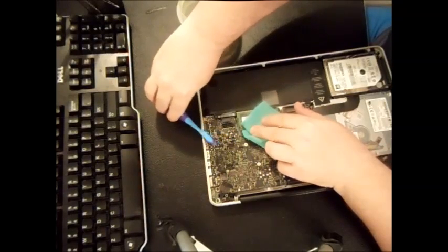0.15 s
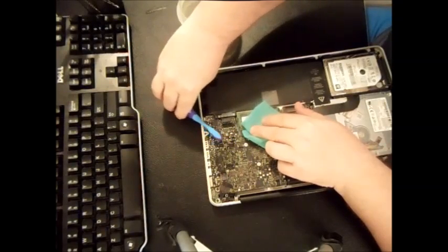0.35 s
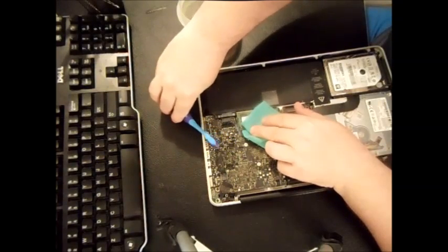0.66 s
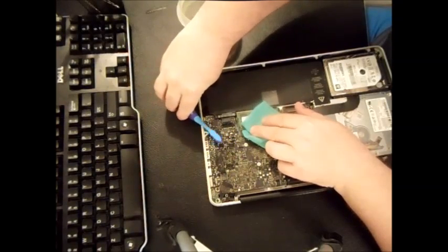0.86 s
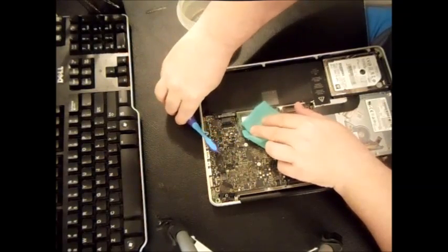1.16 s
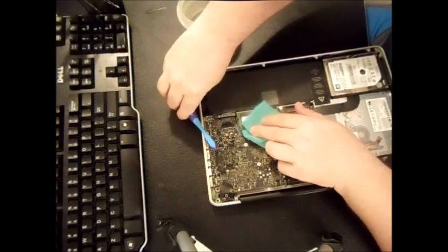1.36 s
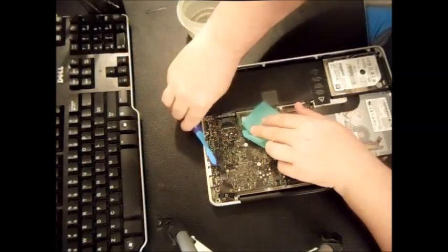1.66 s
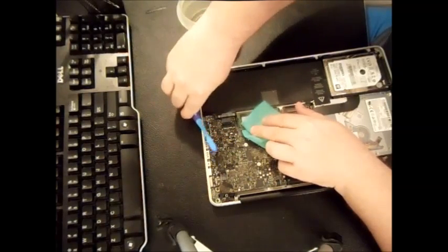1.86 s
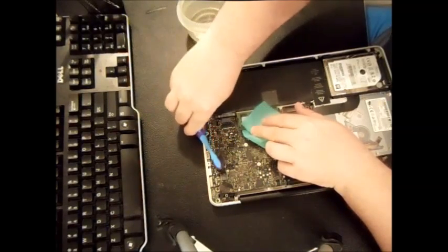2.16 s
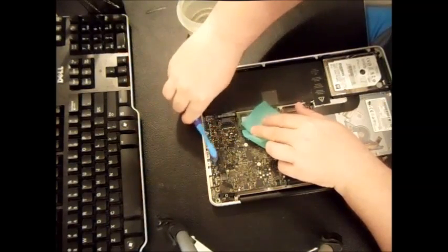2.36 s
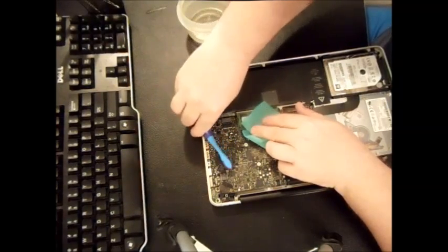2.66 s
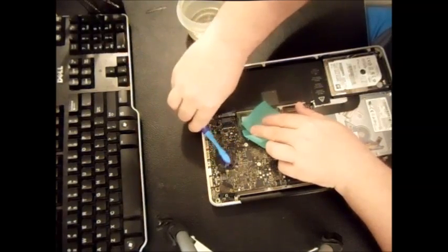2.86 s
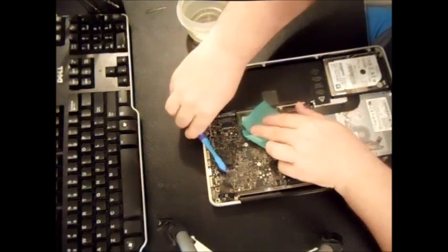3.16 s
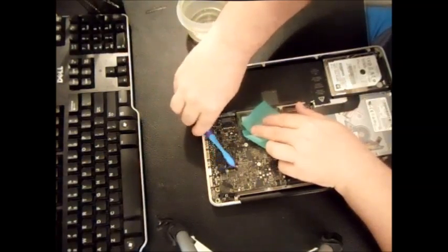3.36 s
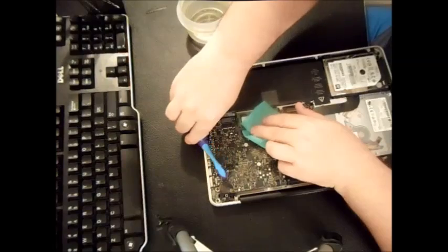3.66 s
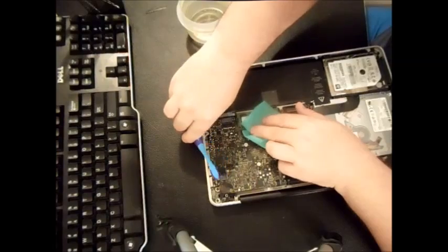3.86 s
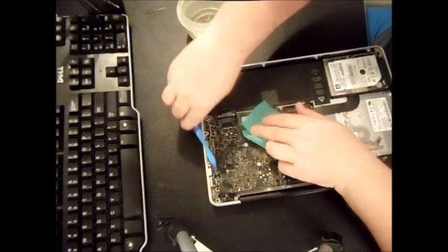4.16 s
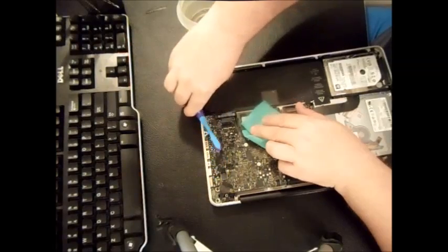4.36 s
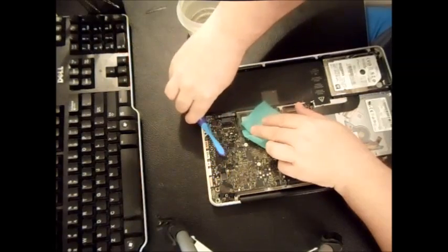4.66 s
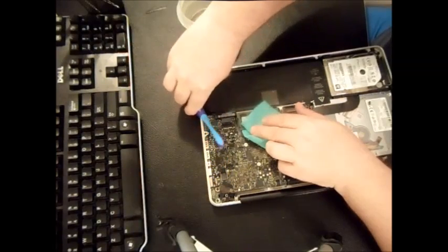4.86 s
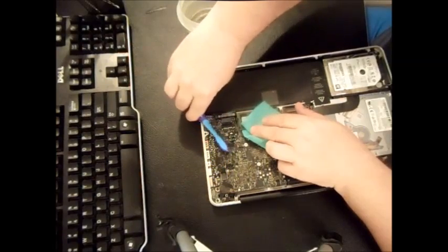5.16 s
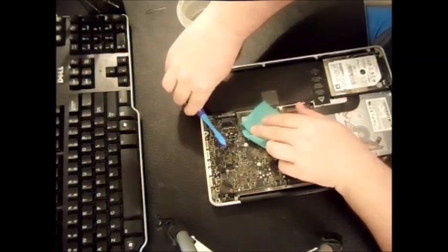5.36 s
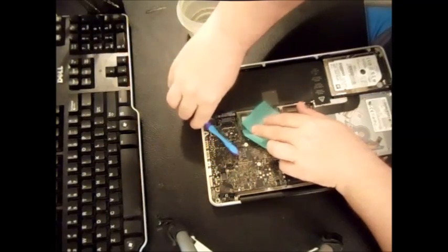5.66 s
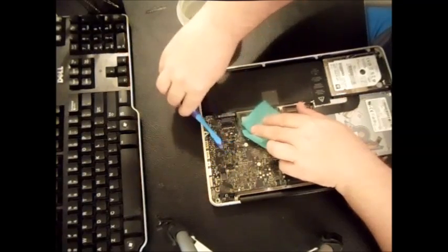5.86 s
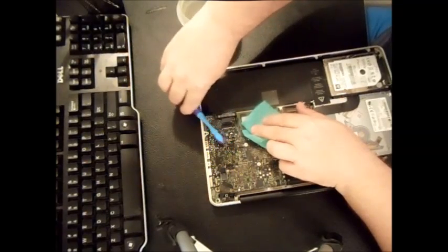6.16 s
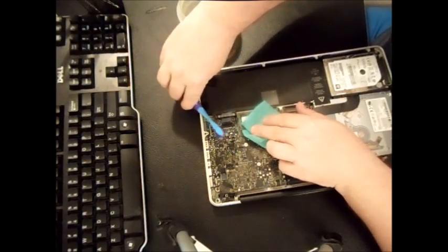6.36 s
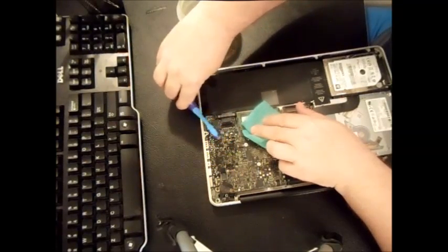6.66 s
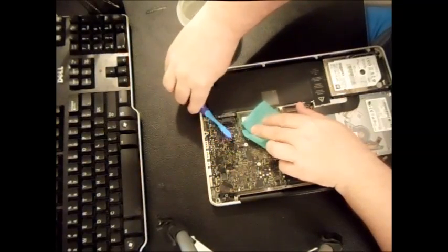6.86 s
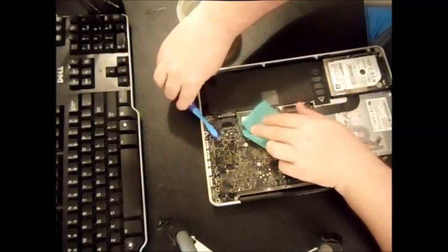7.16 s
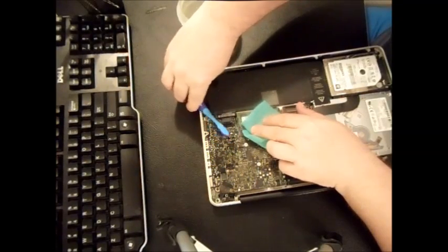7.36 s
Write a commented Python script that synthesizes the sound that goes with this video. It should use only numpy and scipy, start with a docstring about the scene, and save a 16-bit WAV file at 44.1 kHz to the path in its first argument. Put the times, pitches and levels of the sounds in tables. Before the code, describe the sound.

A small brush scrubs a circuit board in short, scratchy strokes with occasional sharp ticks, over a steady low computer hum and rumble.

```python
"""A toothbrush lightly scrubs the circuit board of an opened laptop on a workbench.
From the start a computer hums below: disk and fan tones, rushing fan air and a low rumble of the bench.
Short strokes hiss and crackle throughout, made of tiny random slips that also set the board ringing.
From about 0.4 s on, tufts now and then snap off a component: a bright snap, a knock and a rattle.
The brush moves from the far end to the near end at 2.3 s, to the middle at 4 s and back at 6 s."""
import sys
import numpy as np
from scipy import signal
from scipy.fft import rfft, irfft
from scipy.io import wavfile

SR = 44100
rng = np.random.default_rng(int(sys.argv[2]) if len(sys.argv) > 2 else 0)


def generate_wav(sig):
    """Save sig (samples, or channels by samples) to the path in sys.argv[1] as 16-bit PCM at SR."""
    pcm = np.round(np.clip(np.atleast_2d(sig).T, -1, 1) * 32767).astype(np.int16)
    wavfile.write(sys.argv[1], SR, pcm)


N = 331191
TIME = np.arange(N) / SR  # seconds
FREQS = np.fft.rfftfreq(N, 1 / SR)  # Hz


# colour of the bristle hiss: [pitch_hz, relative_level_db]
BRISTLE_COLOUR = [(500, -35), (1200, 1.5), (2200, -0.5), (3300, 0.5), (4500, 1.5), (5600, 1.5), (7500, 0.5),
                  (8400, -2), (9200, 0), (11500, -2), (13300, -5), (14200, -8)]
# where the brush is on the board: [time_s, place (0 far end, 1 middle, 2 near end)]
BRUSH_PLACE = [(2.3, 0), (2.44, 2), (4.0, 2), (4.4, 1), (6.0, 1), (6.1, 0)]
# resonances of board and brush at three places: [pitch_hz, width_hz, relative_level_db]
FAR_END_MODES = [(2060, 310, 1.5), (4440, 550, -1.5), (5220, 250, -2), (6320, 160, -1), (6940, 240, -3),
                 (7740, 280, 1), (9050, 450, -5.5), (10000, 350, -5.5), (11100, 320, -6), (12400, 380, -5)]
MIDDLE_BOARD_MODES = [(2200, 1300, -8.5), (3900, 220, -4.5), (4950, 300, 0), (5200, 200, -1.5),
                      (5980, 400, -8), (6440, 260, -5), (6900, 330, -6), (9450, 380, -17),
                      (11300, 200, -16)]
NEAR_END_MODES = [(2600, 1700, -0.5), (4060, 240, 7), (4960, 680, 4), (5470, 280, 2), (5700, 300, -4),
                  (6300, 250, -6), (6570, 180, 0.5), (7650, 300, -4), (13000, 360, -10)]


def scrubbing(sparkle_hz=9000, sparkle_db=-3, sparkle_power=1.7, fast_stroke_db=-49, bumps_db=0.94):
    """The bristle tips hiss with each stroke; bearing down rings the part of the board under the brush."""
    # the tufts ride up and down over the components, so the strokes are uneven and the hiss flutters
    bumps = amp(bumps_db * drift(rate_hz=35))
    sweep, bearing = np.array(brush_motion()) * bumps
    hiss_slips = slips(per_s=4000, spread_db=4.5, clump_db=2.5, smooth=0.9)
    flutter = amp(1.0 * drift(rate_hz=20))
    hiss = unit(colour(hiss_slips, BRISTLE_COLOUR) * flutter)

    # fast strokes flick the tips harder, so their crackle grows faster than the hiss
    tip_slips = slips(per_s=2600, spread_db=7, clump_db=7, smooth=0.54)
    highpass = signal.butter(2, sparkle_hz, "high", fs=SR, output="sos")
    tips = signal.sosfilt(highpass, tip_slips)
    sparkle = unit(tips) * (sweep / amp(fast_stroke_db)) ** (sparkle_power - 1)

    # the same friction drives all three parts of the board; the nearest ones sound
    friction = slips(per_s=2500, spread_db=3.5, clump_db=2.5, smooth=0.83)
    place = np.interp(TIME, *np.transpose(BRUSH_PLACE))
    board = np.zeros(N)
    for k, modes in enumerate([FAR_END_MODES, MIDDLE_BOARD_MODES, NEAR_END_MODES]):
        nearness = np.sqrt(np.maximum(1 - abs(place - k), 0))
        board += nearness * unit(ring(friction, modes))

    bristles = amp(-0.36) * hiss + amp(sparkle_db) * sparkle
    return sweep * catches() * bristles + amp(1.5) * bearing * board


# strokes of the brush, levels before the gains in scrubbing():
# [start_s, length_s, level_db, swell_db (from start to end), ring_db (board against sweep)]
BRUSH_STROKES = [(-0.028, 0.17, -54.5, -7, -5), (0.256, 0.17, -61, 6, -4), (0.394, 0.078, -55, 2, -7),
                 (0.492, 0.097, -57, 7.5, -10), (0.625, 0.234, -63, 2, -3.5), (0.864, 0.083, -61.5, -3, -2),
                 (0.96, 0.05, -53, 0, -5.5), (1.014, 0.024, -55, 1, -12), (1.057, 0.18, -61.0, 1, -5),
                 (1.425, 0.14, -63.5, -1, -7), (1.668, 0.114, -64.5, 7, -8), (1.765, 0.018, -61, 2, -12),
                 (1.903, 0.126, -56, 3, -12), (2.041, 0.046, -48, -12, -14), (2.176, 0.25, -63, -1, -6),
                 (2.4, 0.3, -59, -7.5, -1), (2.673, 0.47, -66.5, 3, 4), (3.013, 0.22, -59.5, 2, 0),
                 (3.228, 0.089, -62.5, 12, 0), (3.344, 0.21, -68.5, 3, 7.5), (3.516, 0.094, -52.0, -5, -13),
                 (3.617, 0.14, -58, 2, -10), (3.76, 0.022, -55.5, 1, -14), (4.054, 0.43, -62, -4, -10),
                 (4.417, 0.14, -60, 5, -2.5), (4.592, 0.19, -60.5, 14, -2), (4.804, 0.13, -57.0, 11, -1),
                 (5.01, 0.24, -60, 12.5, 2), (5.302, 0.156, -65, 5.5, 6), (5.453, 0.13, -60, 0, -11),
                 (5.689, 0.18, -55.5, -3.5, 1.5), (5.87, 0.184, -57, -4.5, -3),
                 (6.109, 0.15, -57, -7, -0.5), (6.286, 0.16, -60.5, 5, 0), (6.53, 0.094, -57.5, 6, -0.5),
                 (6.753, 0.097, -56.5, 3, -1), (6.93, 0.17, -58, 13.5, -4), (7.233, 0.13, -59, 7, -0.5),
                 (7.405, 0.14, -60.0, 11, 2)]
STROKE_ATTACK_S, STROKE_RELEASE_S = 0.029, 0.047  # the bristles bend into a stroke and relax after it
RESTING_DB, RESTING_RING_DB = -77, 2  # between strokes the brush still creeps over the board
STROKE_ENDS_DB = -1  # the hand is fastest in mid-stroke and slower at both ends


def brush_motion():
    """Strength of sweep and board ring: each stroke rises, arches, swells or sags, and lets go."""
    sweep = np.full(N, amp(RESTING_DB))
    bearing = sweep * amp(RESTING_RING_DB)
    for start, length, db, swell_db, ring_db in BRUSH_STROKES:
        during = (TIME > start) & (TIME < start + length + 10 * STROKE_RELEASE_S)
        t = TIME[during] - start
        travel = 2 * np.minimum(t / length, 1) - 1  # -1 at the start, +1 at the end
        attack = np.minimum(t / STROKE_ATTACK_S, 1)
        hold = amp(db + swell_db * travel / 2 + STROKE_ENDS_DB * travel ** 2)
        release = np.exp(-np.maximum(t - length, 0) / STROKE_RELEASE_S)
        stroke = attack * hold * release
        # where strokes overlap, the stronger one wins
        sweep[during] = np.maximum(sweep[during], stroke)
        bearing[during] = np.maximum(bearing[during], stroke * amp(ring_db))
    return sweep, bearing


def catches(per_s=22, rise_db=6, fade_s=0.0026):
    """Gain of the sweep as single tufts catch on solder points: brief rasps at random moments."""
    t = np.arange(SR // 20) / SR
    rasp = t / fade_s * np.exp(1 - t / fade_s)
    caught = rng.random(N) * (rng.random(N) < per_s / SR)
    return 1 + (amp(rise_db) - 1) * signal.fftconvolve(caught, rasp)[:N]


def slips(per_s, spread_db, clump_db, smooth):
    """Tiny bristle slips of uneven size, bunched as tufts pass, over smooth sliding friction."""
    sizes = amp(spread_db * np.minimum(rng.exponential(1, N), 4)) * rng.choice([-1, 1], N)
    grains = unit(sizes * (rng.random(N) < per_s / SR))
    sliding = smooth * rng.standard_normal(N)
    bunching = amp(clump_db * drift(rate_hz=130))
    return unit((grains + sliding) * bunching)


# bristle tufts snapping off components, levels before the gains in snaps():
# [time_s, bright_snap_db, dull_knock_db, knock_pitch_hz]
TUFT_SNAPS = [(0.4279, -39, -58, 2700), (2.3257, -26, -35.5, 3200), (2.4145, -53, -43, 2900),
              (2.428, -52, -42, 2700), (2.5207, -33.5, -41.5, 2500), (2.6222, -54, -45, 2700),
              (3.0301, -29.5, -33, 2590), (3.1148, -40, -42.5, 2630), (3.3179, -46, -47, 2700),
              (3.4162, -40.5, -43, 2700), (3.5179, -36.5, -50, 2700), (3.616, -44, -45.5, 3050),
              (3.7316, -28, -37, 2680), (3.764, -55, -47, 2870), (4.6887, -48, -49, 2820),
              (4.969, -56, -46, 2400), (5.0227, -37, -41, 2560), (5.136, -53, -44, 2430),
              (5.2322, -27.5, -38, 2600), (5.4245, -46, -56, 2700), (5.7277, -37, -37.5, 2150),
              (5.8107, -50, -44, 2300), (6.121, -42, -50, 2400), (6.157, -39.5, -53, 2700),
              (7.3762, -50, -39, 1920)]
# resonances of the bright snap: [pitch_hz, width_hz, relative_level_db]
BRIGHT_SNAP_MODES = [(5000, 800, -5), (6240, 600, 0), (8100, 1200, -1.5), (10000, 2200, -5.5),
                     (12300, 2200, -6.5), (13200, 1600, -23)]
# broad resonances of the rattle in every knock: [pitch_hz, width_hz, relative_level_db]
RATTLE_MODES = [(1470, 940, -3), (3360, 800, -6)]
HARD_SNAP_DB = -31.5  # a bright_snap_db above this counts as hard
FIRST_SLIP_S, FIRST_SLIP_DB = 0.0092, -12.5  # before a hard snap the tuft gives a little: how early, how soft


def snaps(snap_db=-3, knock_db=0, rattle_db=-1.5, release_s=0.00058, lead_s=0.0001, knock_width_hz=850):
    """A tuft lets go within a few milliseconds: a bright snap, a pitched knock and a dull rattle."""
    out = np.zeros(N)
    t = np.arange(1024) / SR
    swell = (t / release_s) ** 2 * np.exp(-t / release_s)
    per_ms = np.sqrt(SR / 1000)  # sets a click's energy as an rms level over one millisecond
    for s, bright_db, dull_db, hz in TUFT_SNAPS:
        burst = swell * rng.choice([-1.0, 1.0], len(t))
        snap = ring(burst, BRIGHT_SNAP_MODES)
        knock = t * np.exp(-np.pi * knock_width_hz * t) * np.sin(2 * np.pi * hz * t)
        rattle = ring(burst, RATTLE_MODES)
        parts = [(snap, bright_db + snap_db), (knock, dull_db + knock_db), (rattle, dull_db + rattle_db)]
        for sound, db in parts:
            click = per_ms * amp(db) * sound / np.linalg.norm(sound)
            add(out, s - lead_s, click)
            if bright_db > HARD_SNAP_DB:
                add(out, s - lead_s - FIRST_SLIP_S, amp(FIRST_SLIP_DB) * click)
    return out


# steady tones of the disk and fans: [pitch_hz, rms_db, waver (0 to 1)]
DISK_AND_FAN_TONES = [(120, -35.5, .08), (222, -59, .4), (353, -69, .5), (412.3, -55.3, .25),
                      (422, -58, .25), (474.5, -65, .4), (527.6, -63, .4), (530, -60, .3), (633, -71.5, .5),
                      (1758, -79, .5), (2618.5, -73.5, .4), (7867, -78.7, .6)]
# slow shaking of the bench: [pitch_hz, relative_level_db, waver (0 to 1)]
BENCH_TONES = [(24.9, -25.5, 0.39), (37.5, -34.5, 0.51)]
# broad part of the shaking: [pitch_hz, relative_level_db (per Hz)]
BENCH_NOISE = [(4, -68), (10, -45), (20, -37), (30, -53), (45, -44.5), (62, -65), (85, -73), (200, -110)]
# how strongly the bench shakes: [time_s, rms_db]
BENCH_LEVEL = [(0.0, -25), (0.85, -28), (1.31, -25.5), (2.15, -29.5), (2.55, -24.5), (2.9, -29),
               (3.15, -23.5), (4.05, -27.5), (4.35, -24.5), (5.3, -24), (5.6, -26), (6.3, -25.5),
               (6.95, -30.5), (7.25, -24.5)]
# fan air and room noise, low and high part: [pitch_hz, level_db (per Hz)]
LOW_AIR = [(30, -63), (70, -58), (95, -59), (112, -62.5), (130, -58.5), (160, -65.5), (195, -72.5),
           (250, -68.5), (300, -76.5), (380, -78)]
HIGH_AIR = [(440, -74), (540, -75.5), (600, -80), (800, -82), (950, -82.5), (1450, -89.5), (2200, -91.5),
            (3000, -95), (4500, -100.5)]
# faint hiss of the microphone: [pitch_hz, level_db (per Hz)]
FAINT_HISS = [(6000, -104.5), (7500, -107.5), (10000, -110), (14000, -112.5)]


def computer():
    """Disk and fan tones, the rush of fan air with a faint hiss, and the shaking bench."""
    shaking = unit(tones(BENCH_TONES, waver_hz=0.94) + rush(BENCH_NOISE)) * level(BENCH_LEVEL)
    air = rush(LOW_AIR + HIGH_AIR + FAINT_HISS)
    return air + tones(DISK_AND_FAN_TONES, waver_hz=1.4) + shaking


def tones(rows, waver_hz):
    """Steady tones whose strength and phase wander a little."""
    out = np.zeros(N)
    for hz, db, waver in rows:
        wander = 1 + waver * (drift(waver_hz) + 1j * drift(waver_hz))
        turning = np.exp(2j * np.pi * (hz * TIME + rng.random()))
        out += amp(db) * unit((wander * turning).real)
    return out


def rush(spectrum):
    """Steady noise with the given level per Hz."""
    return np.sqrt(SR / 2) * colour(rng.standard_normal(N), spectrum)


def room(x, t60=0.03, wet_db=-14):
    """A short, faint tail from the bench and near walls, falling 60 dB in t60 seconds."""
    t = np.arange(SR // 3) / SR
    tail = rng.standard_normal(len(t)) * amp(-60 * t / t60) * (t > 0.002)
    return x + amp(wet_db) * signal.fftconvolve(x, tail / np.linalg.norm(tail))[:N]


def ring(x, modes):
    """Passes x through parallel resonances of alternating sign."""
    out = np.zeros(len(x))
    for k, (hz, width, db) in enumerate(modes):
        b, a = signal.iirpeak(hz, hz / width, SR)
        out += (-1) ** k * amp(db) * signal.lfilter(b, a, x)
    return out


def drift(rate_hz):
    """Slow random wandering of rms one, up to about the given rate."""
    return unit(irfft(rfft(rng.standard_normal(N)) / (1 + (FREQS / rate_hz) ** 4), N))


def colour(x, spectrum):
    """Filters by (Hz, dB) points joined on a log-frequency axis."""
    hz, db = np.transpose(spectrum)
    gain = amp(np.interp(np.log(FREQS + 1), np.log(hz + 1), db))
    return irfft(rfft(x) * gain, N)


def level(curve):
    """Gain at every sample from rows of (s, dB)."""
    return amp(np.interp(TIME, *np.transpose(curve)))


def amp(db):
    """Decibels to gain."""
    return 10 ** (np.asarray(db) / 20)


def unit(x):
    """Scales to an rms of one."""
    return x / np.sqrt(np.mean(x ** 2) + 1e-20)


def add(mix, s, sound):
    """Mixes a sound in at time s."""
    part = mix[max(round(s * SR), 0):][:len(sound)]
    part += sound[:len(part)]


def scene():
    """The brush close by with its room tail, over the hum."""
    brush = room(scrubbing() + snaps())
    return (brush + computer())[None]


def record(dry, edge_hz=14240):
    """A steep low-pass filter removes the treble above the edge."""
    taps = signal.firwin(601, edge_hz, window=("kaiser", 8), fs=SR)
    return signal.oaconvolve(dry, taps[None], "same")


dry = scene()
out = record(dry)
generate_wav(out)
```